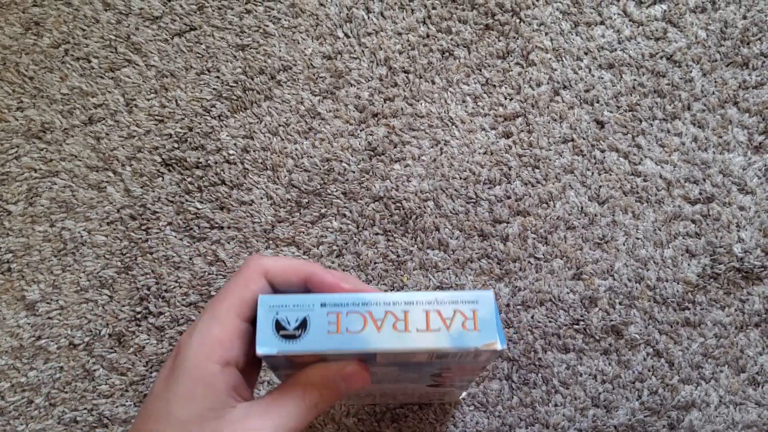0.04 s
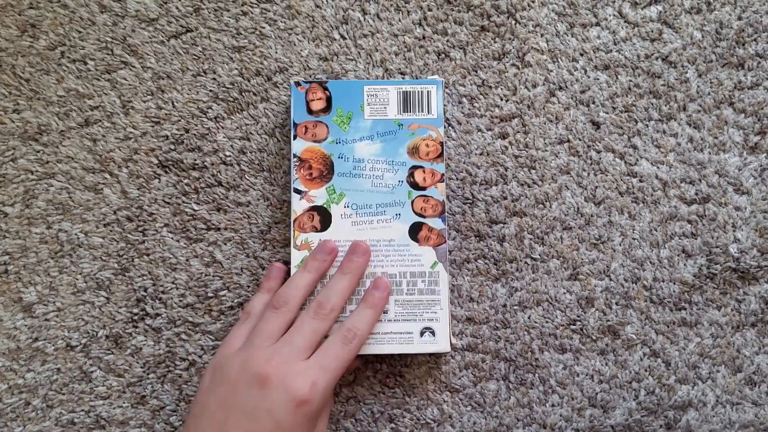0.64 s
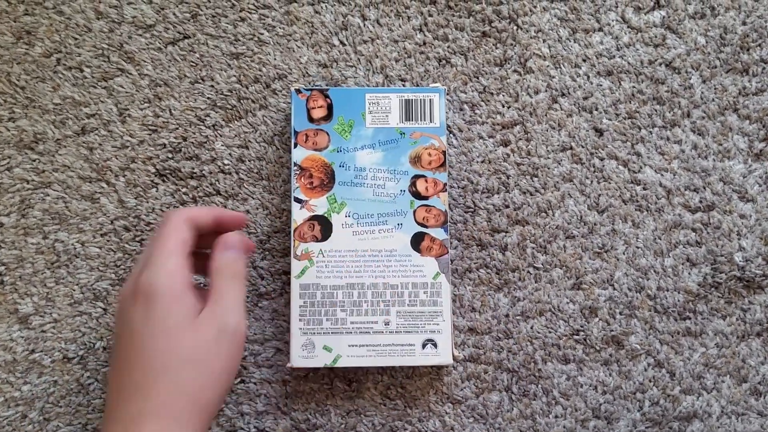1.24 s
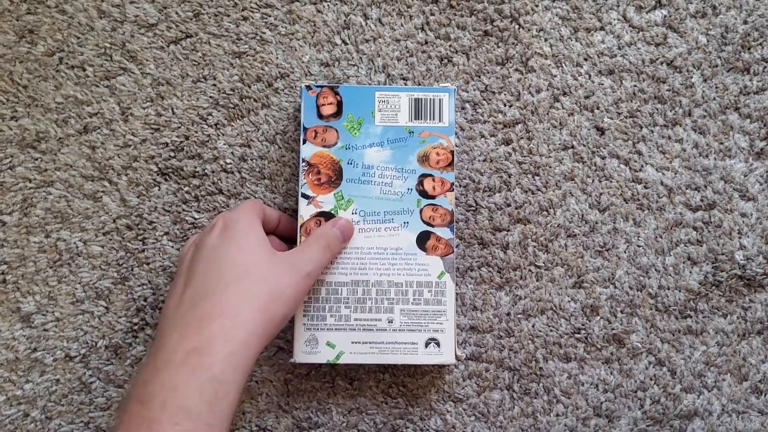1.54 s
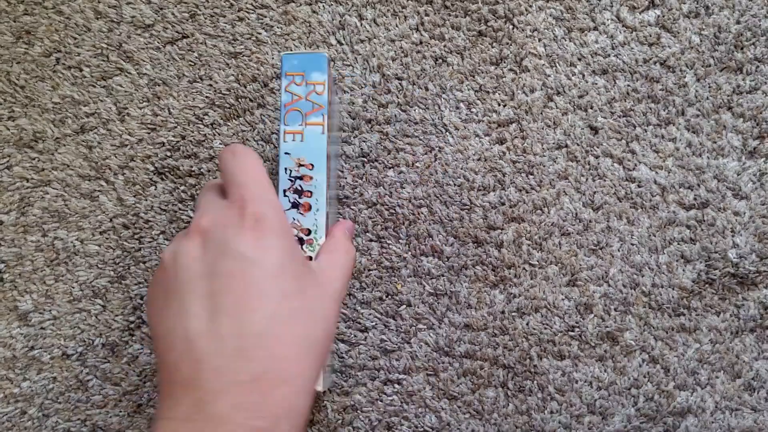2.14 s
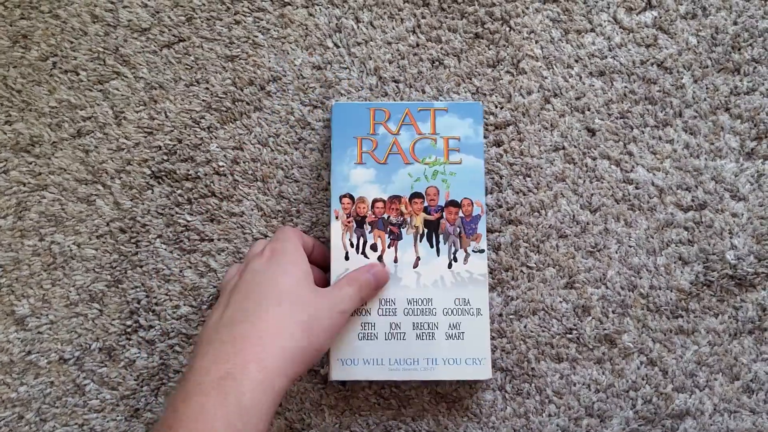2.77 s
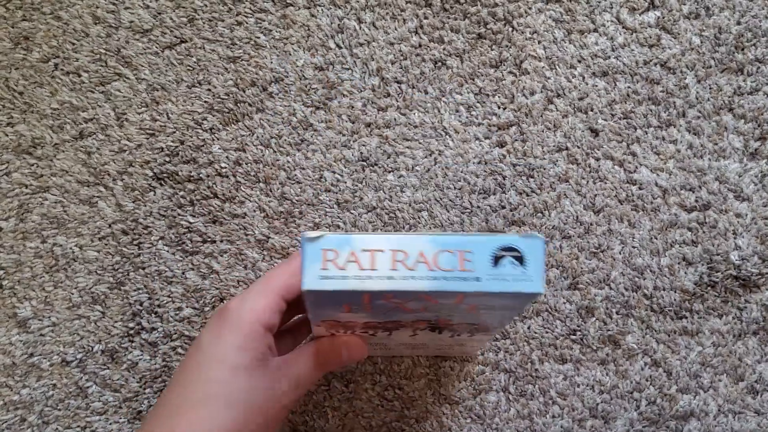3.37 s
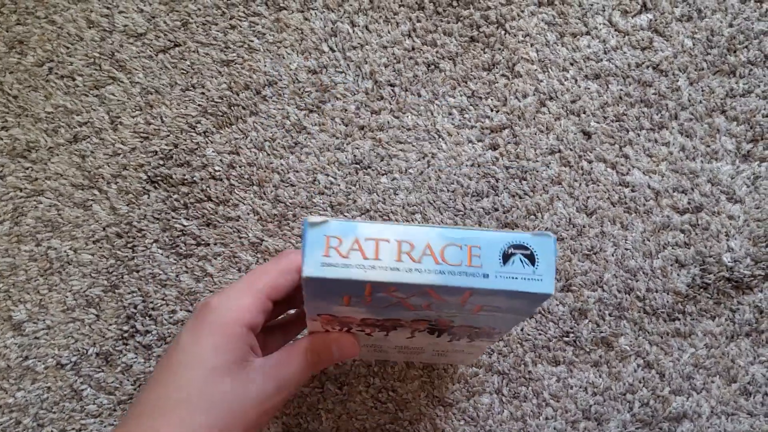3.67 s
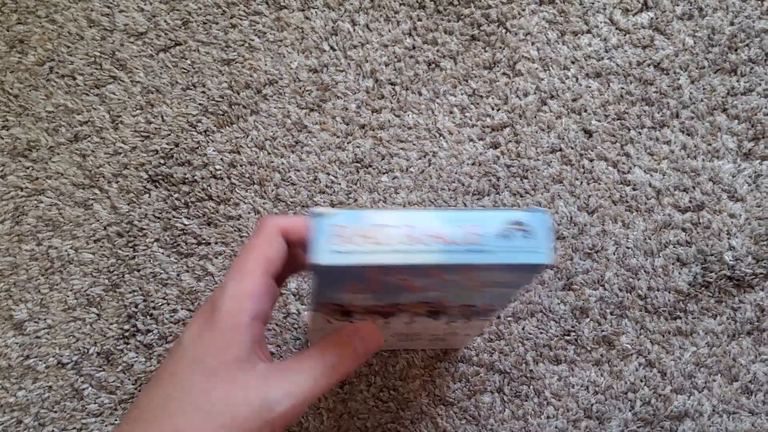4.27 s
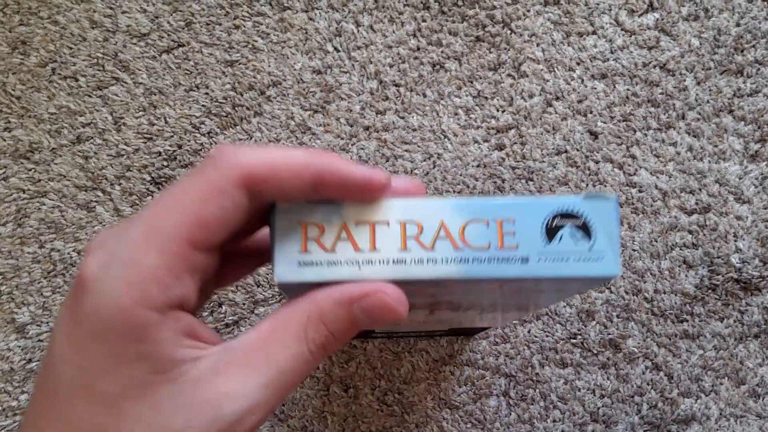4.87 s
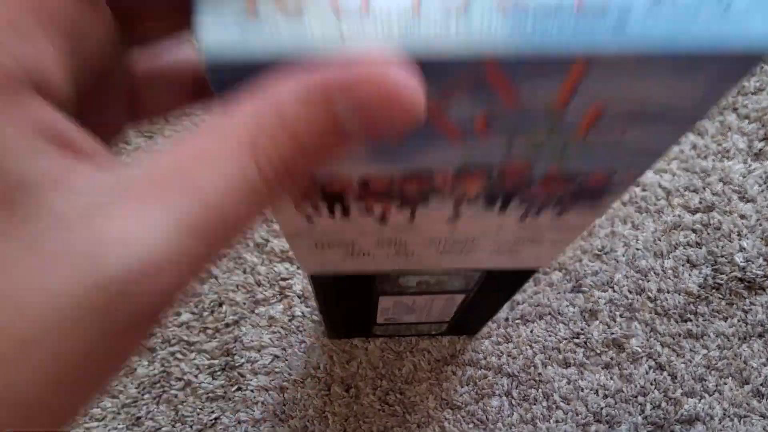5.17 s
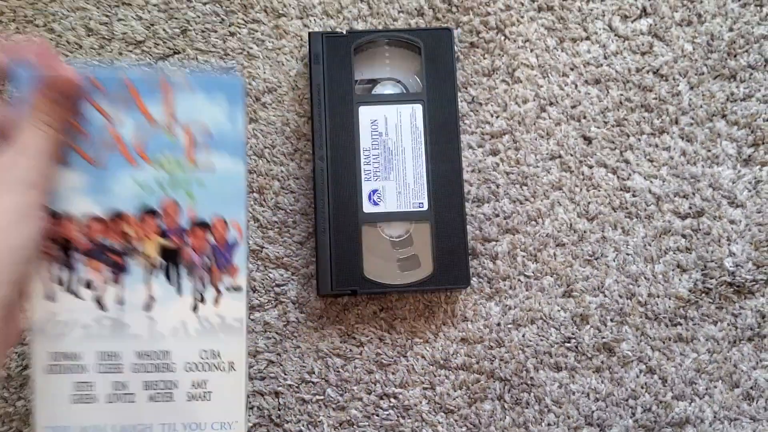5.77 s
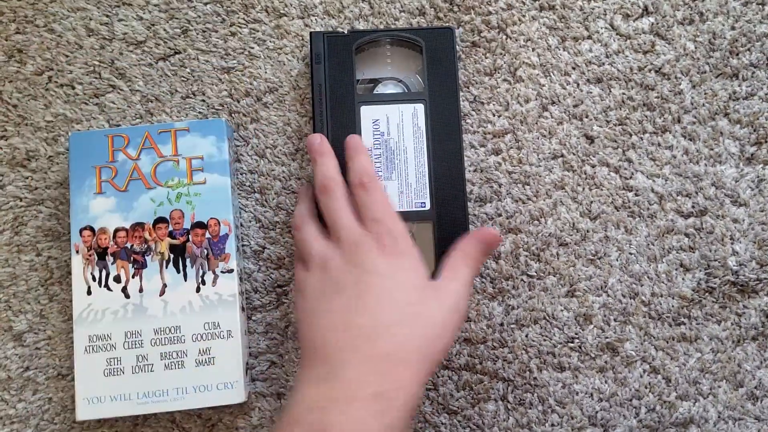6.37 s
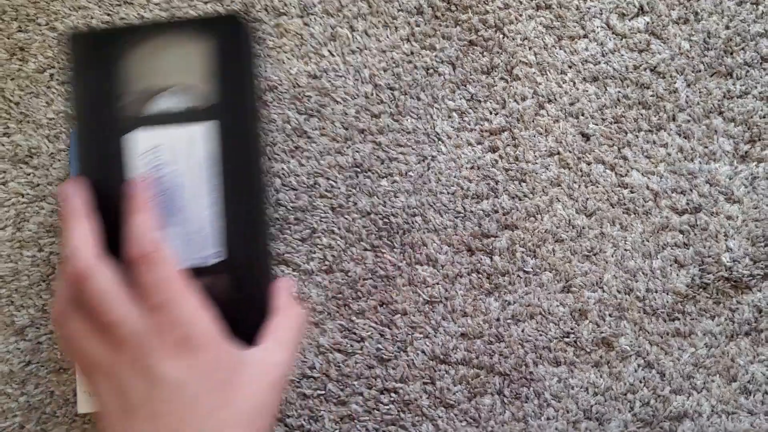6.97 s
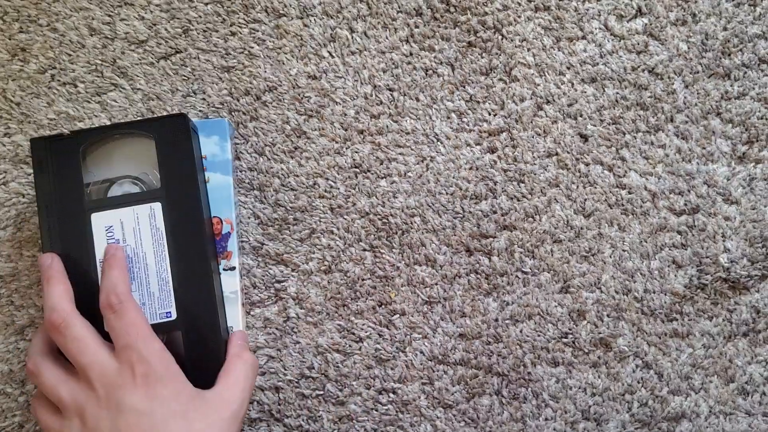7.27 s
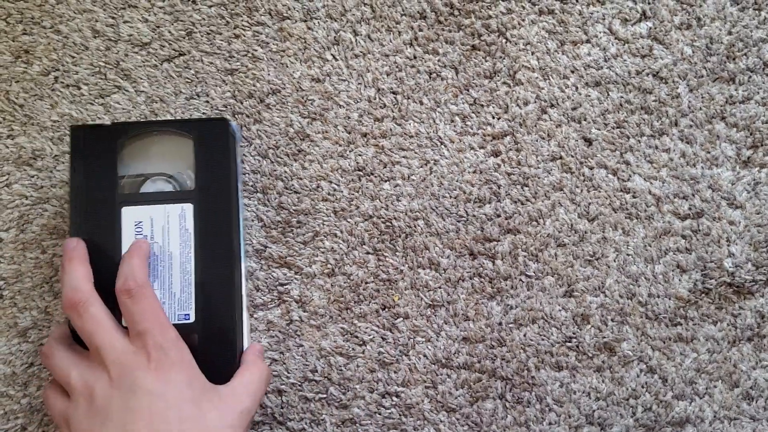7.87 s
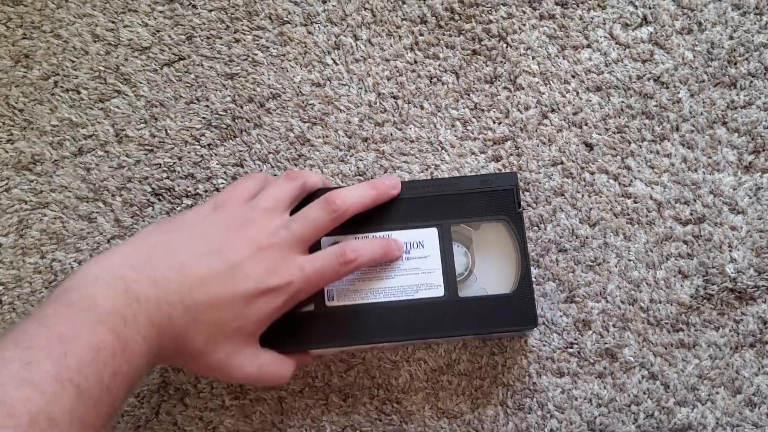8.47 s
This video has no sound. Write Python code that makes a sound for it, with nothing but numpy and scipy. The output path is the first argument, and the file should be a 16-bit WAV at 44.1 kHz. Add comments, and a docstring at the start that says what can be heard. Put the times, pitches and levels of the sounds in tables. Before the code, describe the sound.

Knocks, finger taps and a short cardboard scrape as a video cassette is handled and unsleeved in a small room with a humming fan.

```python
"""A video cassette in its cardboard sleeve topples onto a carpet (0.5 s); the shell rings and the
loose reels chatter. It is turned over and stood up. The sleeve is drawn off in two pulls, rasping
and juddering by stick-slip friction (4.7-5.3 s). The bare cassette falls flat (5.7 s) and is then
clapped onto the hollow sleeve (7.2 s). In between, fingers tap and brush the card, and throughout
a fan hums with a slow beat in the small room."""
import sys
import numpy as np
from scipy import signal
from scipy.fft import rfft, irfft
from scipy.io import wavfile
from scipy.ndimage import uniform_filter1d, map_coordinates

SR = 44100
rng = np.random.default_rng(int(sys.argv[2]) if len(sys.argv) > 2 else 0)


def generate_wav(sig):
    """Save sig (samples, or channels by samples) to the path in sys.argv[1] as 16-bit PCM at SR."""
    pcm = np.round(np.clip(np.atleast_2d(sig).T, -1, 1) * 32767).astype(np.int16)
    wavfile.write(sys.argv[1], SR, pcm)


N = 384552
T = np.arange(N) / SR

# Impacts. Each row: start in seconds, level in dB, softness (treble loss) in dB per octave,
# weight (extra bass) in dB, contact decay in seconds.
CASSETTE_KNOCKS = [(0.023, -36.5, 10, -0.5, 0.0086), (0.05, -34.5, 6.5, -5, 0.0085),
                   (0.062, -42.5, 3.5, 3, 0.0068), (0.503, -36, 1, -4, 0.0029), (0.5085, -17, 5, 3, 0.0025),
                   (0.516, -16, 3.5, -7, 0.0026), (0.6268, -18, 3.5, -1.5, 0.002),
                   (0.677, -45, 7, 8, 0.0017), (1.896, -47.5, 5.5, 8.5, 0.0064),
                   (2.277, -34.5, 10.5, -2.5, 0.0046), (2.626, -22.5, 3, 6, 0.0031),
                   (2.679, -37.5, 5.5, 0, 0.0026), (3.311, -44.5, 8, -2.5, 0.00087),
                   (4.159, -32, 7.5, -16, 0.0015), (4.166, -38, 9, 0.5, 0.0077),
                   (4.331, -41, 5.5, 6, 0.0047), (4.34, -47, 5, 14.5, 0.014), (4.361, -44.5, 15, 4, 0.0058),
                   (4.377, -42.5, 6, -4, 0.0029), (5.672, -30.5, -0.5, 8.5, 0.0057),
                   (5.689, -31.5, 6.5, 5.5, 0.01), (6.708, -38, 8.5, -11, 0.0027),
                   (8.34, -41, 7, -5, 0.0027)]  # the cassette meets the carpet or shifts in its sleeve
SLEEVE_CLAPS = [(4.703, -33.5, 6.1, -9, 0.0016), (4.889, -39.5, 3.9, 3, 0.0028),
                (5.21, -30.5, 4.7, -18, 0.0028), (5.259, -23, 27, -3, 0.0074),
                (7.229, -24.5, 7.8, 1.5, 0.0055), (7.2388, -17.5, 8.8, 3.5, 0.0069),
                (7.256, -32, 5.5, 4, 0.0085), (7.273, -33.5, 6.5, -4, 0.0058)]
FINGER_TAPS = [(0.221, -47.5, 2.5, 3.5, 0.0027), (1.017, -54, 8, -2, 0.0018), (1.034, -45, 1.8, 3, 0.0018),
               (1.405, -48.5, 2.5, -11, 0.0031), (1.973, -39.5, 2, 1.5, 0.0025),
               (1.991, -38, 7.5, -2, 0.0052), (2.968, -53, 1, -1, 0.0053), (3.014, -43.5, 4, -1, 0.0059),
               (3.498, -47.5, 3.5, 0, 0.0032), (5.984, -49, 5, 5.5, 0.0028), (6.069, -49.5, -3, -2, 0.002),
               (6.41, -45, 10, -1, 0.004), (8.3, -44.5, 2.5, -4, 0.0041)]
# Resonances. Each row: frequency in Hz, bandwidth in Hz, gain in dB.
CASE_MODES = [(286, 210, 13), (422, 110, 7), (877, 400, 6.5), (1940, 77, -4), (2630, 79, -2),
              (4030, 680, 0.5), (5000, 170, -4.5)]
SLEEVE_MODES = [(242, 51, 8.2), (443, 86, 12.7), (733, 30, 6.1), (1007, 190, 24.5), (1000, 40, 24),
                (1360, 230, 15)]
REEL_MODES = [(434, 90, 20), (511, 24, 26), (840, 36, 5), (1140, 43, 6.4), (1480, 35, 1.7), (1830, 69, 18),
              (2040, 140, 8.2), (2720, 42, 3), (4140, 65, 9.3), (4980, 79, 21), (5600, 58, 13)]
# The thud, knock, crack and snap bands of an impact. Each row: lower and upper edge in Hz.
CASE_BANDS = [(160, 447), (680, 2710), (2600, 6300), (9000, 14600)]
SLEEVE_BANDS = [(240, 510), (740, 1340), (2000, 7200), (7500, 13200)]
# Air under a landing face. Each row: start in seconds, level in dB, frequency in Hz,
# half the rise time in seconds.
AIR_PUFFS = [(0.384, -32, 55, 0.0041), (0.5038, -7.5, 140, 0.0016), (0.509, -19.5, 340, 0.0011),
             (0.627, -15.5, 303, 0.0024), (2.622, -15, 98, 0.0021), (2.626, -8.5, 279, 0.0022),
             (5.261, -30, 134, 0.0048), (5.669, -12.5, 122, 0.0025), (5.670, -14, 159, 0.0012),
             (7.2365, -17, 422, 0.0017)]
# Reel chatter after a fall. Each row: start in seconds, level in dB, decay in seconds.
REEL_RATTLES = [(0.52, -19.5, 0.025), (0.537, -25, 0.013), (0.641, -40, 0.018), (2.645, -51, 0.018),
                (5.69, -44, 0.043)]
# Pulls on the sleeve. Each row: end in seconds, final relative friction level in dB,
# judder length in seconds, final relative judder level in dB.
SLEEVE_PULLS = [(4.889, -32, 0.077, -44.5), (5.262, -31, 0.16, -36)]
# Relative levels of the judder's harmonics in dB, fundamental first.
JUDDER_HARMONICS_DB = [-6, -0.5, -7, -6, -10]
# Skin and carpet brush the box. Each row: centre in seconds, length in seconds, level in dB.
BRUSH_STROKES = [(0.045, 0.036, -52), (1.45, 0.089, -70), (1.98, 0.089, -56.5), (3.014, .1, -56.5),
                 (3.157, 0.11, -58.5), (4.114, 0.42, -63.5), (4.426, 0.17, -57), (6.068, 0.027, -47),
                 (7.542, 0.26, -59), (8.087, 0.37, -62), (8.45, 0.25, -58.5)]
# Skin slips on glossy card. Each row: centre in seconds, level in dB.
SKIN_SQUEAKS = [(0.225, -63), (0.718, -55)]
# Large arm movements. Each row: start in seconds, end in seconds, rumble level in dB.
ARM_MOVES = [(0, 0.5, -53), (1.81, 2.6, -52), (5.22, 5.35, -54)]
# Spectral shapes. Each row: frequency in Hz, relative level in dB.
REEL_SPECTRUM = [(200, 2.5), (400, -3), (1000, -3.5), (2500, -5.5), (5000, -14.5), (8000, -10),
                 (16000, -26)]
FRICTION_SPECTRUM = [(120, -27), (220, -9.5), (380, -15), (520, -7.5), (800, -10.5), (1200, -7), (2000, -5),
                     (3000, -5), (4500, -1), (8000, -15.5), (14000, -18), (16000, -17)]
BRUSH_SPECTRUM = [(400, 1), (1500, -2.5), (4500, -4.5), (8000, -11), (15000, -13)]
FAN_AIR_SPECTRUM = [(80, -46), (130, -1.5), (170, -7), (260, -7), (400, -4), (520, -2), (800, -4.5),
                    (1500, -11.5), (2200, -13), (2750, -20), (3200, -25.5), (5000, -27.5), (11500, -33),
                    (16000, -37.5)]
REVERB_SPECTRUM = [(100, 0), (350, -2.5), (1000, -1.5), (3000, 1), (12000, -3)]
# The hum's lower tone. Each row: time in seconds, distance below the steady tone in Hz.
BEAT_RATE = [(0, 0.18), (0.78, 3.94), (1.2, 2.7), (2.07, 4.36), (2.94, 3.72), (3.4, 1.23), (4.57, 4.15),
             (5.4, 2.93), (6.17, 3.48), (7.11, 1.36), (8.7, 2.28)]
# Strength of that tone. Each row: time in seconds, level in dB.
LOWER_TONE_LEVEL = [(1, -57), (2.7, -49.5), (4.3, -57), (6.6, -60), (7.4, -49.5), (8.5, -68)]
# Weaker fan and mains tones. Each row: frequency in Hz, level in dB, nominal linewidth in Hz.
FAN_TONES = [(121, -60.5, 0.068), (187.6, -67, 2.2), (248, -68.5, 3), (295, -66, 2.7), (394, -58.5, 2.8)]
# Reverberation. Each row: frequency in Hz, time to fall by 60 dB in seconds.
ROOM_T60 = [(80, 0.18), (250, 0.19), (1000, 0.24), (4000, 0.22), (15000, 0.26)]
# The diffuse field. Each row: frequency in Hz, left-right correlation from -1 to 1.
COHERENCE = [(100, 1), (200, 0.81), (380, 0.64), (700, 0.061), (1300, -0.074), (2400, 0.11), (8000, -0.059)]


def impacts(rows, modes, bands, scatter, rise_s, spread, snap_db):
    """Impact excitation: one impulse and a dying spray of micro-contacts drive a body's modes."""
    out, t = np.zeros((2, N)), T[:SR // 12]
    starts, knock_db, softness, weight_db, decay_s = np.transpose(rows)
    _, knock, crack, snap = np.log2(bands).mean(axis=1)  # band centres in octaves
    levels = [knock_db + weight_db, knock_db, knock_db - softness * (crack - knock),
              knock_db - softness * (snap - knock) + snap_db]
    # a flat face needs a moment to settle into full contact
    contact = (1 - np.exp(-t / rise_s)) * np.exp(-t / decay_s[:, None])
    contact /= np.linalg.norm(contact, axis=1, keepdims=True)
    spray = stereo(rng.standard_normal((2, *contact.shape)), spread) * contact
    sounds = 0
    for db, (low, high) in zip(levels, bands):
        force = (t == 0) + scatter * low / 1000 * spray  # the spray carries the treble
        ring = band(resonate(force, modes), low, high, order=3)
        peak_rms = np.sqrt(uniform_filter1d(np.mean(ring ** 2, axis=0), size=220).max(axis=1))
        sounds = sounds + ring * (from_db(db) / peak_rms)[:, None]
    for k, start in enumerate(starts):
        add(out, start, sounds[:, k])
    return out


def air_puffs():
    """Air displacement: a flat face lands and expels a cushion of air in a few pressure swings."""
    out, t = np.zeros(N), T[:SR // 5]
    for start, db, hz, half_rise_s in AIR_PUFFS:
        age = t / (2 * half_rise_s)
        envelope = (age * np.exp(1 - age)) ** 2
        add(out, start, from_db(db) * envelope * np.sin(2 * np.pi * hz * t))
    return out


def reel_rattle():
    """Repeated collision: the loose reels bounce in the shell and ring in their own modes."""
    shake = sum(from_db(db) * (T > start) * np.exp(-np.abs(T - start) / decay_s)
                for start, db, decay_s in REEL_RATTLES)
    contacts = stereo(colour(grains(per_s=2000, spread_db=-0.5), REEL_SPECTRUM), spread=0.36)
    return resonate(contacts * shake, REEL_MODES) / np.std(resonate(contacts[0, :SR], REEL_MODES))


def sleeve_slide(start_s, end_s, drag_db, judder_end_hz, judder_rise_hz_per_s):
    """Stick-slip friction: card rasps over plastic and, late in each pull, judders ever faster."""
    attack, release, pull_rise = 505, 1500, 47  # dB per second
    power, judder_gain, slip_hz = from_db(drag_db) ** 2, 0, judder_end_hz
    for pull_end, friction_db, judder_s, judder_db in reversed(SLEEVE_PULLS):
        effort = held(pull_end, pull_end, pull_rise, release)
        power += (from_db(friction_db) * effort) ** 2
        judder_gain += from_db(judder_db) * effort * held(pull_end - judder_s, pull_end, attack, release)
        remaining_s = np.clip(pull_end - T, 0, .5)
        slip_hz = np.where(T < pull_end, judder_end_hz - judder_rise_hz_per_s * remaining_s, slip_hz)
    rub_gain = np.sqrt(power) * held(start_s, end_s, attack, release)
    phase = 2 * np.pi * np.cumsum(slip_hz * (1 + 0.0349 * drift(250))) / SR
    # the two faces of the sleeve rub separately, a little harder at each slip
    faces = colour(grains(per_s=6000, spread_db=2.0), FRICTION_SPECTRUM) * (1 + 0.12 * np.sin(phase))
    grit = stereo(faces, spread=0.62)
    rasp = from_db(-0.46 + 1.5 * drift(70)) * unit_rms(band(grit, 150, 3460))
    hiss = from_db(-3.5) * unit_rms(band(grit, 2840, 14000))
    # each harmonic flutters as the grip changes
    judder = sum(from_db(db + 3.5 * drift(60)) * np.sin(k * phase)
                 for k, db in enumerate(JUDDER_HARMONICS_DB, 1))
    return rub_gain * (rasp + hiss) + from_db(4.5) * judder_gain * unit_rms(judder)


def brushes():
    """Sliding friction: skin and carpet make broadband noise that swells and fades with each stroke."""
    strokes = sum(from_db(db) * swell(centre, length) for centre, length, db in BRUSH_STROKES)
    return strokes * colour(rng.standard_normal((2, N)), BRUSH_SPECTRUM)


def squeaks(hz, width_hz, length_s):
    """Friction squeal: a fingertip slipping on glossy card sounds briefly in one narrow band."""
    whistle = unit_rms(band(rng.standard_normal((2, N)), hz - width_hz / 2, hz + width_hz / 2))
    return whistle * sum(from_db(db) * swell(centre, length_s) for centre, db in SKIN_SQUEAKS)


def arm_rumble(rest_db):
    """Low-frequency noise: arm movements raise an uneven rumble above its resting level."""
    gain = from_db(rest_db)
    for start, end, db in ARM_MOVES:
        gain = np.maximum(gain, from_db(db) * held(start, end, attack_db_per_s=200, release_db_per_s=60))
    noises = unit_rms(band(rng.standard_normal((2, N)), 38, 79))
    return gain * from_db(5 * drift(12)) * stereo(noises, spread=0.51)


def beating_hum(steady_hz, steady_db):
    """Beating: the sum of two close tones swells and sinks at their difference frequency."""
    steady = unit_rms(np.sin(2 * np.pi * steady_hz * T))
    lower_hz = steady_hz - over_time(BEAT_RATE)
    lower = unit_rms(np.sin(2 * np.pi * np.cumsum(lower_hz) / SR))
    return from_db(steady_db) * steady + from_db(over_time(LOWER_TONE_LEVEL)) * lower


def fan(air_db):
    """Broadband and tonal noise: a diffuse rush of air, a beating hum and weaker wavering tones."""
    coherence = at_hz(COHERENCE, np.arange(N // 2 + 1) * SR / N)
    mid, side = irfft(rfft(rng.standard_normal((2, N))) * np.sqrt([1 + coherence, 1 - coherence]), N)
    air = from_db(air_db) * colour(mid + side * [[1], [-1]], FAN_AIR_SPECTRUM)
    tones = beating_hum(steady_hz=98.4, steady_db=-48.5)
    for hz, db, width_hz in FAN_TONES:
        tone = np.sin(2 * np.pi * hz * T + drift(2 * width_hz))
        tones += from_db(db) * unit_rms(tone * (1 + 0.27 * drift(4.6)))
    return air + tones


def room(x, wet_db):
    """Reverberation: a diffuse tail follows the direct sound and decays exponentially in each band."""
    t, response = T[:SR // 3], 0
    onset = np.clip((t - .005) / 0.0039, 0, 1)
    edges = np.geomspace(70, 17000, 9)
    for low, high in zip(edges, edges[1:]):
        hz = np.sqrt(low * high)
        tail = onset * from_db(-60 * t / at_hz(ROOM_T60, hz))
        tail *= from_db(at_hz(REVERB_SPECTRUM, hz)) / np.linalg.norm(tail)
        coherence = at_hz(COHERENCE, hz)
        mid, side = rng.standard_normal((2, len(t)))
        diffuse = np.sqrt(1 + coherence) * mid + np.sqrt(1 - coherence) * side * [[1], [-1]]
        response += band(diffuse * tail, low, high)
    direct = np.array([np.roll(x[0], -2), x[1]])  # arrives two samples earlier on the left
    reverb = signal.oaconvolve(x, response, axes=1)[:, :N]
    return balance(direct + from_db(wet_db) * reverb, left_db=1.0)


def resonate(force, modes):
    """Modal superposition: the contact itself plus one damped oscillator for each mode."""
    out = force.copy()
    for hz, width_hz, db in modes:
        radius = np.exp(-np.pi * width_hz / SR)
        feedforward = np.array([1, 0, -1]) * (1 - radius ** 2) / 2
        feedback = [1, -2 * radius * np.cos(2 * np.pi * hz / SR), radius ** 2]
        out += from_db(db) * signal.lfilter(feedforward, feedback, force + 1e-18)
    return out


def grains(per_s, spread_db):
    """Shot noise: two streams of tiny random contacts of uneven size."""
    hits = rng.random((2, N)) < per_s / SR
    out, count = np.zeros((2, N)), hits.sum()
    signs = rng.choice([-1, 1], count)
    out[hits] = signs * from_db(spread_db * np.minimum(rng.exponential(1, count), 4))
    return out


def drift(knots_per_s):
    """Random modulation: a smooth curve of unit RMS."""
    knots = rng.standard_normal(int(T[-1] * knots_per_s) + 4)
    return unit_rms(map_coordinates(knots, [T[::32] * knots_per_s + 1], order=3)).repeat(32)[:N]


def held(start, end, attack_db_per_s, release_db_per_s):
    """Exponential rise and decay around a gain of 1 held from start to end."""
    loss_db = attack_db_per_s * np.maximum(start - T, 0) + release_db_per_s * np.maximum(T - end, 0)
    return from_db(-loss_db) + 1e-12


def swell(centre_s, length_s):
    """Gaussian envelope, length_s wide at 1/e of its peak."""
    return np.exp(-np.minimum((2 * (T - centre_s) / length_s) ** 2, 50))


def stereo(noises, spread):
    """Mid-side mixing: one part is in phase in both channels, the other in antiphase."""
    mid, side = noises
    return np.array([mid + spread * side, mid - spread * side]) / np.hypot(1, spread)


def balance(x, left_db):
    """Level difference: the left channel gains left_db over the right."""
    return x * from_db(np.array([[left_db], [-left_db]]) / 2)


def band(x, low, high, order=2):
    """Causal band-pass filtering, edges in Hz."""
    return signal.sosfilt(signal.butter(order, [low, high], "band", fs=SR, output="sos"), x)


def colour(x, spectrum):
    """Spectral shaping of a steady sound, at unit RMS."""
    hz = np.arange(x.shape[-1] // 2 + 1) * SR / x.shape[-1]
    return unit_rms(irfft(rfft(x) * from_db(at_hz(spectrum, hz)), x.shape[-1]))


def at_hz(points, hz):
    """Interpolation on a log-frequency axis."""
    frequencies, values = np.transpose(points)
    return np.interp(np.log(hz + 1e-9), np.log(frequencies), values)


def over_time(points):
    """Linear interpolation at every sample."""
    return np.interp(T, *np.transpose(points))


def add(out, start_s, x):
    """Superposition of a short sound from a given time."""
    i = round(start_s * SR)
    out[..., i:i + x.shape[-1]] += x[..., :N - i]


def from_db(db):
    """Amplitude ratio of a level in decibels."""
    return 10 ** (np.asarray(db) / 20)


def unit_rms(x):
    """Normalisation to unit power."""
    return x / np.sqrt(np.mean(x ** 2) + 1e-20)


def scene():
    """Superposition: the handling sounds and their reverberation add to the rumble and the fan."""
    cassette = impacts(CASSETTE_KNOCKS, CASE_MODES, CASE_BANDS,
                       scatter=4.4, rise_s=0.0036, spread=0.68, snap_db=-5.0)
    puffs = balance(air_puffs(), left_db=-0.2)
    sleeve = impacts(SLEEVE_CLAPS, SLEEVE_MODES, SLEEVE_BANDS,
                     scatter=1.7, rise_s=0.0018, spread=0.9, snap_db=4.0)
    fingers = impacts(FINGER_TAPS, CASE_MODES, CASE_BANDS,
                      scatter=3.5, rise_s=0.00065, spread=0.79, snap_db=-5.5)
    reels = reel_rattle()
    rubbing = brushes() + squeaks(hz=6150, width_hz=700, length_s=0.023)
    handling = room(cassette + puffs + fingers + reels + rubbing, wet_db=-12.0)
    slide = sleeve_slide(start_s=4.655, end_s=5.262, drag_db=-40.5,
                         judder_end_hz=422.4, judder_rise_hz_per_s=580)
    card = room(sleeve + slide, wet_db=-14.5)
    rumble = balance(arm_rumble(rest_db=-65), left_db=10.5)
    return handling + card + rumble + balance(fan(air_db=-51), left_db=2.0)


def record(dry):
    """Band limiting and saturation: deep bass is shed, peaks are rounded and the top is cut."""
    thin = signal.sosfilt(signal.butter(3, 40, "high", fs=SR, output="sos"), dry)
    rounded = thin / (1 + (thin / .88) ** 6) ** (1 / 6)
    return signal.sosfilt(signal.ellip(10, .1, 80, 15850, fs=SR, output="sos"), rounded)


dry = scene()
out = record(dry)
generate_wav(out)
```